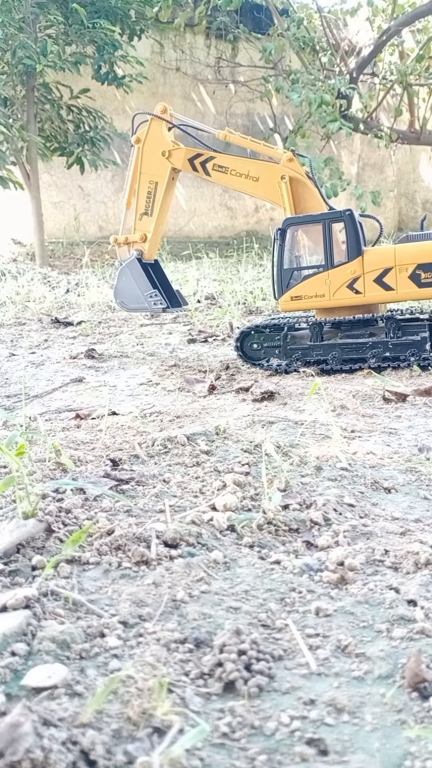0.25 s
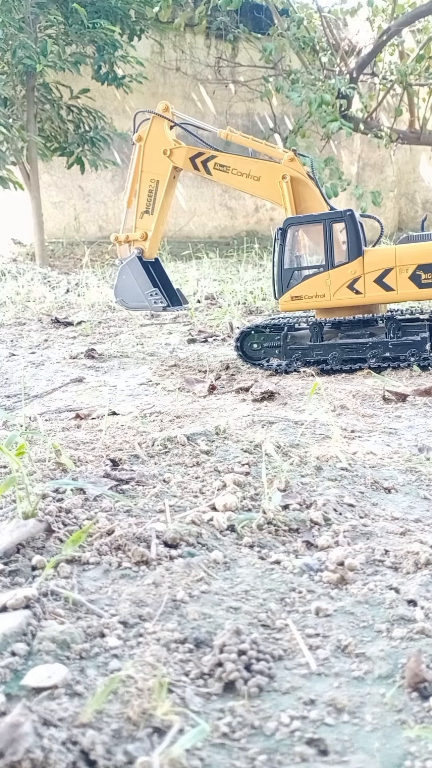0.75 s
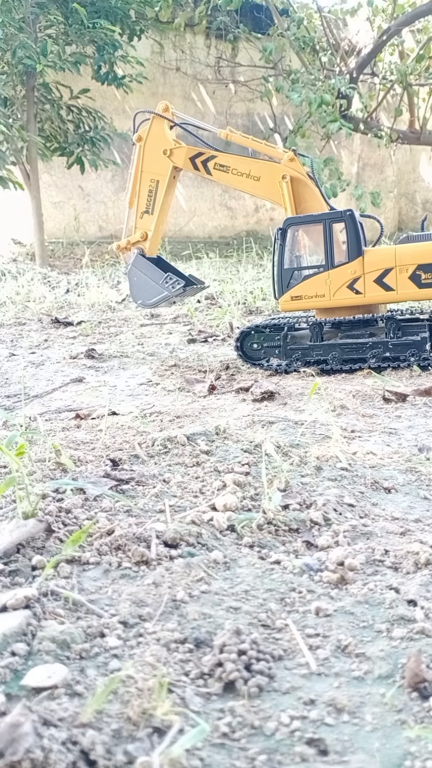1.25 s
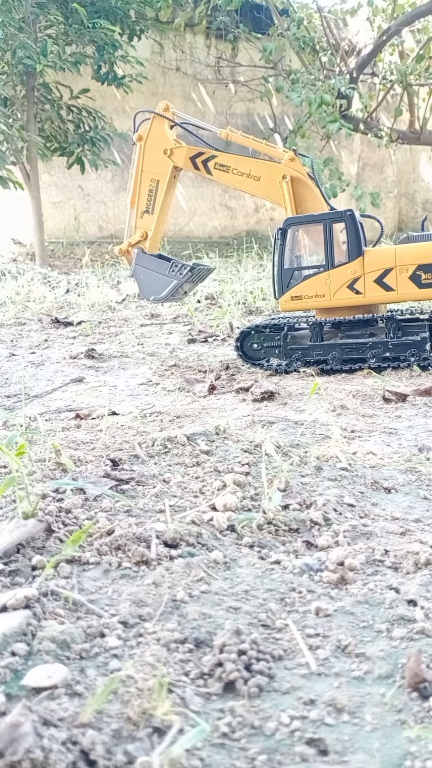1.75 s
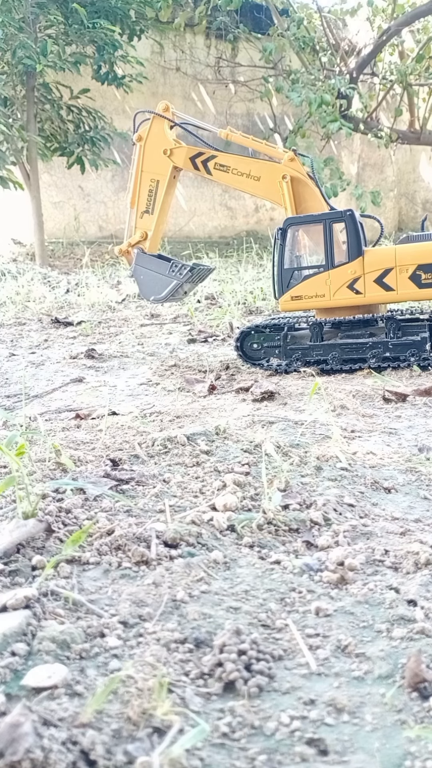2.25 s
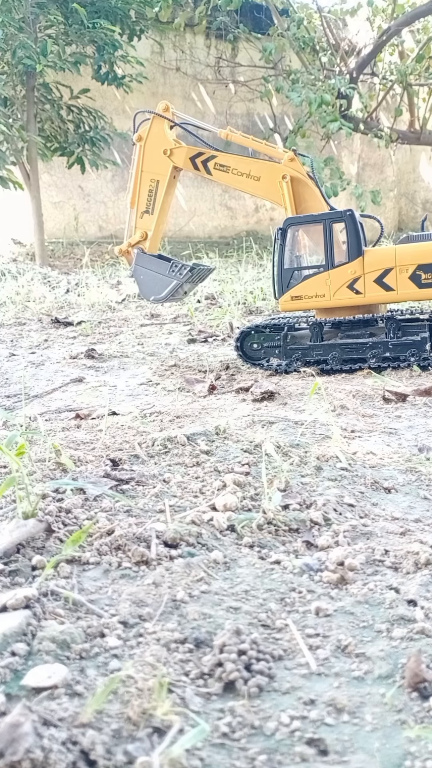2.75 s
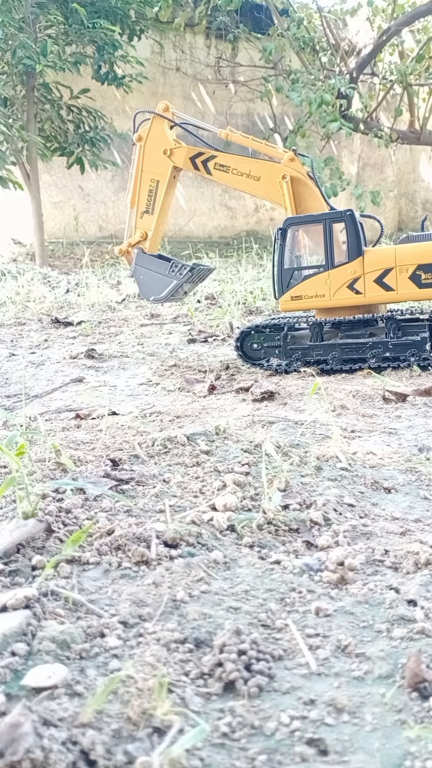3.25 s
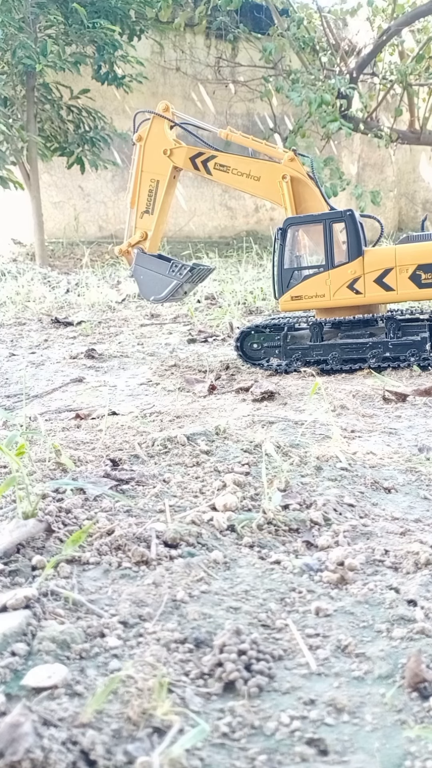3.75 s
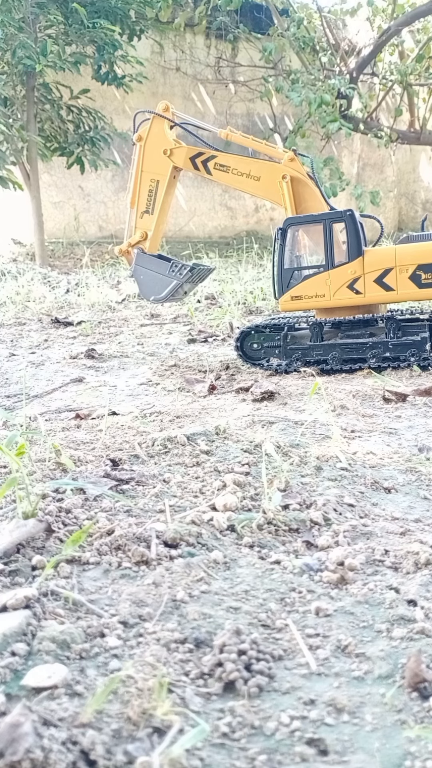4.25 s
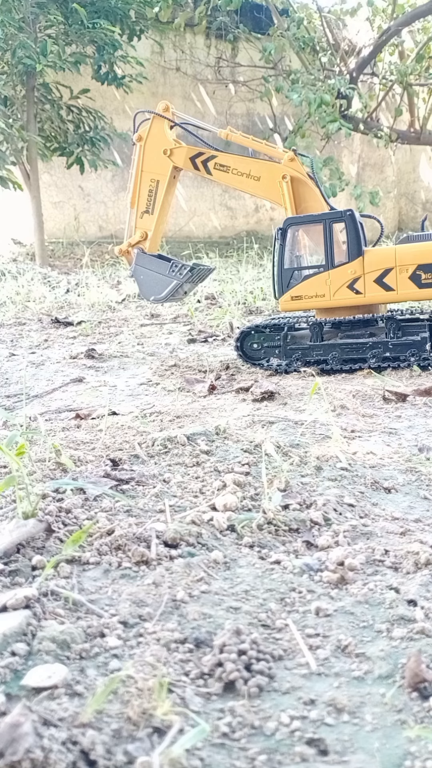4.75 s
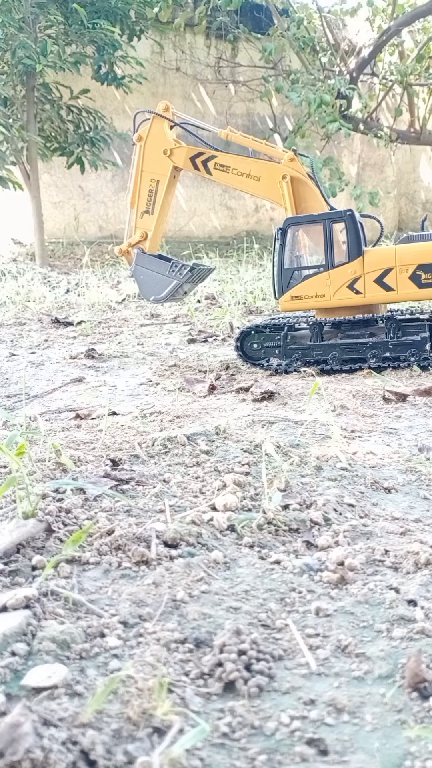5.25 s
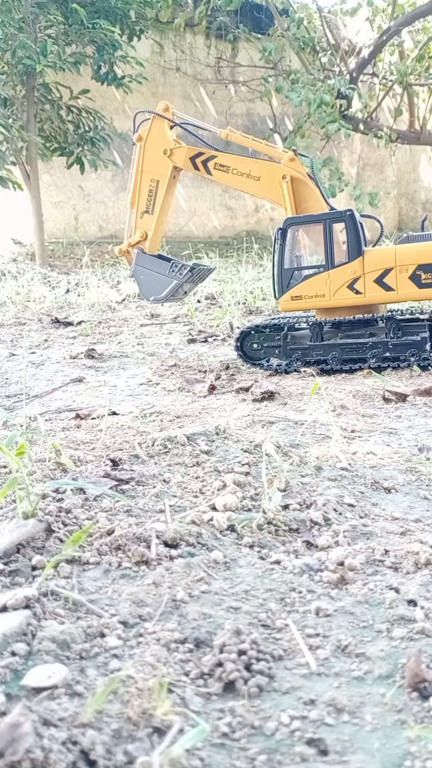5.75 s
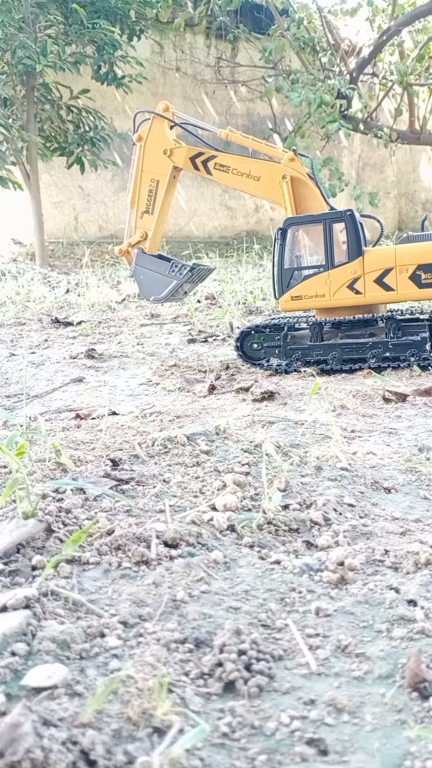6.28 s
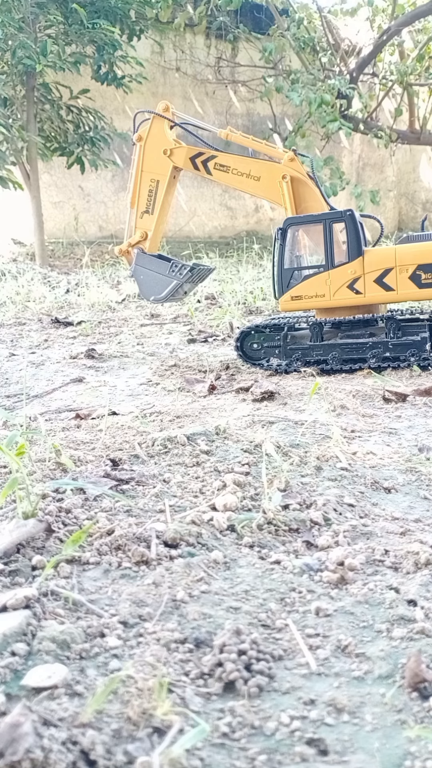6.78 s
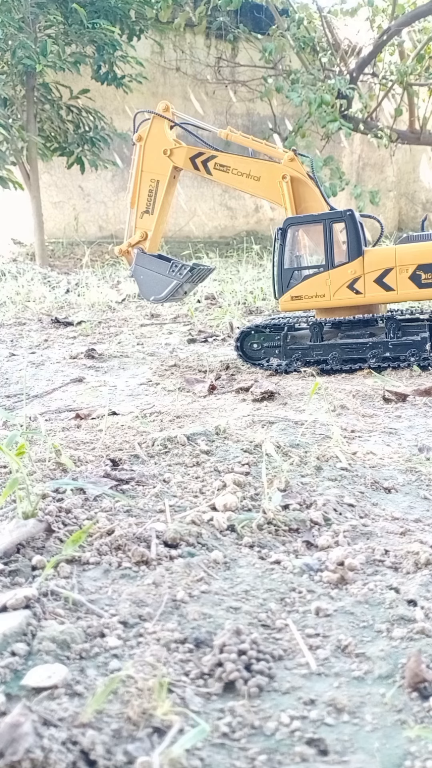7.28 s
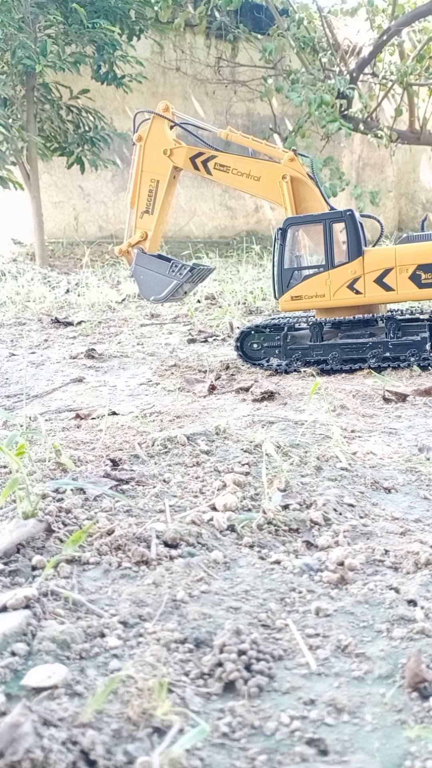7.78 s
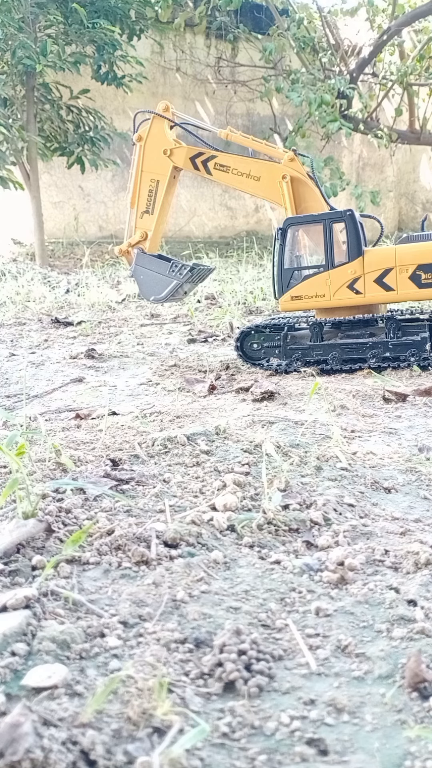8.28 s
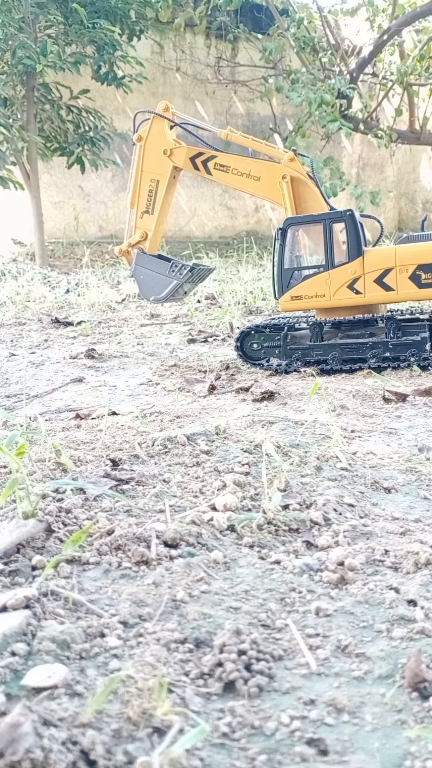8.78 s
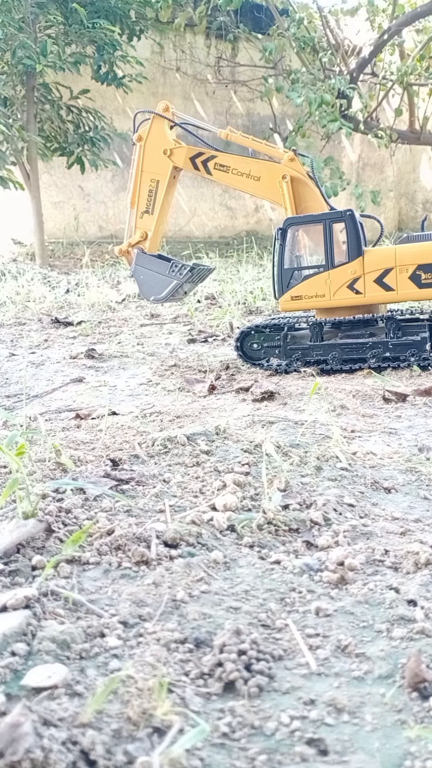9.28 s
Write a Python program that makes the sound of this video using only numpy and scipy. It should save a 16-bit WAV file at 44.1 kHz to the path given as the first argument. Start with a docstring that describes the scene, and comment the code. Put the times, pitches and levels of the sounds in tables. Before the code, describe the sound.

A toy digger's little motor whirs twice, plastic keeps clicking irregularly, then scuffs dry soil and knocks hardest near the end, over quiet outdoor air.

```python
"""A toy digger in a small walled yard, heard by one microphone over a low distant rumble and soft air.
Small birds chirp further off from the start; then plastic clicks begin, sharp and uneven.
The geared motor soon whirs in two short bursts that curl the bucket, and the clicks go on.
From about 5 s plastic also scuffs the soil; past 8 s come the hardest knocks and a last nudge of the motor.
Clicks and knocks are struck resonances, the motor is meshing teeth, and noise tails answer from the walls."""
import sys
import numpy as np
from scipy import signal
from scipy.fft import rfft, irfft, next_fast_len
from scipy.io import wavfile
from scipy.ndimage import map_coordinates

SR = 44100
rng = np.random.default_rng(int(sys.argv[2]) if len(sys.argv) > 2 else 0)


def pcm_store(signal):
    """Save signal as 16-bit PCM."""
    levels = np.round(np.clip(np.atleast_2d(signal), -1, 1) * 32767)
    wavfile.write(sys.argv[1], SR, levels.astype(np.int16).T)


N = 419832

# plastic clicks: start_s [s], knock_hz [Hz], knock_db [dB], overtone_db [dB], snap_db [dB],
# hardness_db of the contact [dB]
CLICKS = [(0.7172, 1090, -35.5, -52, -36.5, 6), (1.14, 1100, -30, -38.5, -30, -10.5),
          (1.3883, 1036, -33.5, -63, -30.5, 3), (1.66, 1140, -31, -39, -31, -4),
          (2.1305, 1080, -36.5, -48.5, -30.5, 3.5), (2.4107, 1113, -31.5, -36.5, -30.5, -3),
          (2.504, 1000, -46.5, -38.5, -34.5, 3.5), (3.1183, 1147, -34.5, -34, -34, 0),
          (3.302, 1060, -44, -42.5, -35.5, 4), (3.657, 1146, -39.5, -34, -36.5, -5),
          (3.663, 1035, -30.5, -38.5, -28.5, 1), (3.713, 1116, -51, -46, -44.5, -0.5),
          (4.0783, 1144, -33, -32.5, -31, -1.5), (4.101, 1080, -56.5, -64, -48, -13),
          (4.1329, 990, -55, -55.5, -48.5, 0.5), (4.305, 1040, -34.5, -39.5, -33, 1.5),
          (4.578, 1105, -36.5, -35, -41.5, 6.5), (4.6002, 975, -35, -35, -31, 3),
          (4.8703, 1070, -55.5, -48.5, -37, 1), (4.9385, 1020, -32, -40, -32, -3.5),
          (5.0747, 970, -85, -88.5, -57.5, -4), (5.12, 1050, -64.5, -60, -42, -9),
          (5.44, 996, -32, -40, -29.5, 0), (5.946, 1040, -71.5, -70.5, -48, 1.5),
          (6.0031, 1054, -33, -36.5, -29, 7.5), (6.047, 990, -47, -48, -47, 4),
          (6.053, 1024, -46.5, -44, -31, 1), (6.2772, 1070, -76, -79, -55, -8),
          (6.435, 893, -43.5, -49.5, -44.5, -1.5), (6.7599, 918, -34, -44.5, -44, -0.5),
          (6.8136, 1180, -61, -68, -45.5, -2), (6.8619, 1230, -67, -80, -56, 4.5),
          (7.0455, 960, -42.5, -54, -49.5, -4), (7.062, 905, -39.5, -69, -55.5, -10),
          (7.2828, 1070, -36.5, -41.5, -34.5, 1.5), (7.319, 1210, -65, -50, -48, 0),
          (7.3654, 1030, -53.5, -64, -46.5, -0.5), (7.949, 1020, -62, -80, -63, -7),
          (8.1336, 1200, -65, -57, -42, -6.5), (8.139, 1090, -58, -59, -37.5, 0),
          (8.146, 1000, -44.5, -47, -40, 3), (8.167, 1056, -24.5, -30, -27, 2.5),
          (8.1726, 950, -30, -31, -25.5, 9), (8.177, 1085, -32.5, -41, -28, 3),
          (8.1939, 1087, -40.5, -40, -39, -4), (8.2296, 1080, -50, -50, -47, -6),
          (8.239, 1060, -48, -46.5, -40.5, -2), (8.2574, 1070, -60, -58, -48, 1),
          (8.4032, 980, -36, -68, -33.5, 3.5), (8.487, 990, -76.5, -80.5, -47, 4),
          (8.9366, 956, -32, -52.5, -39, -7.5), (9.3379, 886, -44, -37.5, -49.5, -7),
          (9.343, 1030, -35, -43, -40.5, 3)]
# modes of the plastic shell: mode_hz [Hz], width_hz [Hz], level_db before the hardness weighting [dB]
SHELL_MODES = [(2366, 223, 5), (2720, 310, 1.5), (3260, 490, -2), (3890, 310, 2.5)]
# colour of a snap's bright edge: freq_hz [Hz], relative level_db before the fizz gain [dB]
EDGE_COLOUR = [(3000, -45.5), (4300, 7), (4950, 5.5), (6000, -9), (6900, -10), (8400, -27.5), (9400, -50.5),
               (10400, -36), (11800, -55.5), (14800, -24), (16000, -31)]
SNAP_HZ, SNAP_HZ_PER_DB = 3228, 25.5  # centre of the snap; a harder contact raises it
EDGE_DB = -8.5  # bright edge relative to the snap, at hardness 0
# edge level where the top treble starts to gain [dB], gain per dB, most gain [dB]
FIZZ_FROM_DB, FIZZ_GROWS, FIZZ_MAX_DB = -42, 1.5, 9.5


def clicks(knock_hz_width=290, overtone_hz=1560, overtone_hz_width=380, slip_s=0.006,
           snap_decay_s=0.0032, rattle_db=-26, rattle_t60=0.032, focus=0.42, scuff=0.12,
           room_db=-18, knock_room_db=-21):
    """Each click is a few ms of slipping contact that rings the shell and two hollow body modes."""
    out, t = np.zeros(N), np.arange(SR // 20) / SR
    contact = np.exp(-t / snap_decay_s) + amp(rattle_db - 60 * t / rattle_t60)

    def scrape():
        return contact * rng.standard_normal(len(t))

    def blow():
        slip = np.exp(-(t / slip_s) ** 2) * rng.standard_normal(len(t))
        return (t == 0) + scuff * slip

    for s, knock_hz, knock_db, overtone_db, snap_db, hardness_db in CLICKS:
        snap = strength(above(filtered(scrape(), shell_response(hardness_db, focus)), 1300), snap_db)
        # harder snaps are richer in the highest treble
        edge_db = snap_db + EDGE_DB + hardness_db
        fizz_db = min(FIZZ_GROWS * (edge_db - FIZZ_FROM_DB), FIZZ_MAX_DB)
        edge = [(hz, db + (hz > 8000) * fizz_db) for hz, db in EDGE_COLOUR]
        snap += strength(above(filtered(scrape(), causal(edge)), 3000), edge_db)

        knock = strength(above(ring(blow(), knock_hz, knock_hz_width), knock_hz), knock_db)
        varied_hz = overtone_hz * (1 + 0.013 * rng.normal())
        overtone = above(ring(blow(), varied_hz, overtone_hz_width), 760)
        knock += strength(overtone, overtone_db)

        add(out, s, snap + knock)
        add(out, s, strength(panels(), snap_db + PANEL_DB))
        to_walls = amp(room_db) * snap + amp(knock_room_db) * knock
        add(out, s, yard(to_walls, stretch=0.6, delay=0.014))
    return out


def shell_response(hardness_db, focus):
    """Resonances of the shell in parallel; a harder contact favours the higher modes."""
    snap_hz = SNAP_HZ + SNAP_HZ_PER_DB * hardness_db
    modes = []
    for mode_hz, width_hz, db in SHELL_MODES:
        weight = np.exp(-(np.log(mode_hz / snap_hz) / focus) ** 2 * 2)
        modes.append((mode_hz * (1 + 0.011 * rng.normal()), width_hz, amp(db) * weight))

    def response(hz):
        total = 0
        for k, (f, w, gain) in enumerate(modes):
            # neighbouring modes alternate in sign
            total = total + (-1) ** k * gain * 1j * hz * w / (f * f - hz * hz + 1j * hz * w)
        return total / (1 + (hz / 5000) ** 8)
    return response


# lowest and highest mode [Hz], decay time [s], level relative to the snap [dB]
PANEL_LOW_HZ, PANEL_HIGH_HZ, PANEL_T60, PANEL_DB = 2403, 5920, 0.18, -20


def panels(count=5):
    """Thin panels ring on in a few narrow modes, different ones for every contact."""
    t = np.arange(SR // 4) / SR
    hz = PANEL_LOW_HZ * (PANEL_HIGH_HZ / PANEL_LOW_HZ) ** rng.random((count, 1))
    modes = np.sin(2 * np.pi * hz * t).sum(0) * amp(-60 * t / PANEL_T60)
    return modes / np.linalg.norm(modes)


# heavier knocks that also shake the chassis: start_s [s], pitch_hz [Hz], level_db [dB]
THUDS = [(5.442, 865, -56.5), (6.437, 483, -60.5), (6.761, 873, -48.5), (7.062, 704, -57),
         (8.168, 684, -37.5), (8.176, 623.4, -40), (8.198, 670, -51), (8.404, 650, -51)]


def thuds(width_hz=230, slip_s=0.0089, room_db=-17):
    """The heavier knocks ring the chassis lower down."""
    out, t = np.zeros(N), np.arange(SR // 20) / SR
    for s, hz, db in THUDS:
        push = (t == 0) + 0.34 * np.exp(-t / slip_s) * rng.standard_normal(len(t))
        thud = strength(ring(push, hz, width_hz), db)
        add(out, s, thud)
        add(out, s, amp(room_db) * yard(thud, stretch=1.1, delay=0.02))
    return out


# motor bursts (two curl the bucket, a late one only nudges it), one curve each:
# time_s [s], effort_db [dB], tooth_hz before the load wobble [Hz]
MOTOR_RUNS = [
    [(.87, -70.5, 1240), (.9, -50.5, 1161), (.97, -47.5, 1008), (1.05, -50.5, 930), (1.12, -45.5, 951),
     (1.2, -54.5, 882), (1.27, -62, 790), (1.37, -69, 775)],
    [(1.46, -59.5, 854), (1.525, -51.5, 1028), (1.565, -53.5, 1074), (1.595, -44.5, 1112),
     (1.63, -52, 1076), (1.68, -47, 1161), (1.73, -65, 1223), (1.77, -85, 1220)],
    [(8.37, -65.5, 902), (8.42, -54, 991), (8.48, -62, 1018), (8.525, -64, 985), (8.55, -78, 900)],
]
# colour of the gearbox housing: freq_hz [Hz], relative level_db [dB]
HOUSING_COLOUR = [(400, -46), (700, -12.5), (920, -8.5), (1150, -8), (1350, -16.5), (1650, -6),
                  (2500, -11.5), (3100, -18), (3850, -7), (4450, -3), (5250, -20.5), (6900, -12),
                  (8500, -45), (11300, -46), (12900, -24.5), (15500, -21)]
# the whine swells where the teeth hit the body's resonance: centre, half width, most gain
WHINE_PEAK_HZ, WHINE_WIDTH_HZ, WHINE_PEAK_DB = 1130, 76, 6.5


def gearbox(whir_db=-0.95, whine_db=-9, room_db=-8, grind_db=2.0):
    """Meshing teeth whine; uneven partials of the pinion's turn and scraping buzz through the housing."""
    out = np.zeros(N)
    for run in MOTOR_RUNS:
        s, *cols = np.transpose(run)
        t = np.arange(s[0], s[-1], 1 / SR)
        size = len(t)
        effort_db, tooth_hz = [np.interp(t, s, c) for c in cols]
        load = 1 + .016 * wobble(40, size) + .012 * wobble(300, size)
        phase = 2 * np.pi * np.cumsum(tooth_hz * load) / SR
        turn = phase / 4  # four teeth on the pinion

        # each partial swells, fades and drifts on its own
        buzz = np.zeros(size)
        for k in range(5, 58):
            swell = amp(5 * wobble(30, size))
            buzz += swell * np.sin((k + .3 * rng.normal()) * turn + 2 * wobble(45, size))
        scrape = rng.standard_normal(size) * (1 + .5 * np.sin(turn))
        grind = (.4 * scrape + unit(buzz)) * amp(grind_db * wobble(200, size))
        housing = coloured(grind, HOUSING_COLOUR)

        mesh = unit(np.sin(phase + .5 * wobble(160, size)) * amp(4 * wobble(90, size)))
        resonance_db = WHINE_PEAK_DB / (1 + ((tooth_hz - WHINE_PEAK_HZ) / WHINE_WIDTH_HZ) ** 2)
        sound = amp(effort_db) * (amp(whir_db) * housing + amp(whine_db + resonance_db) * mesh)
        add(out, s[0], sound)
        add(out, s[0], amp(room_db) * yard(sound, stretch=0.84, delay=.012))
    return out


# gritty scuffs of plastic on dry soil: peak_s [s], level_db [dB], length_s [s]
SCUFFS = [(4.899, -58, .14), (6.89, -62.5, 0.4), (7.033, -59.5, .15), (7.844, -41.5, .1),
          (7.909, -69, 0.22), (8.214, -41.5, 0.21)]
# colour of the grit: freq_hz [Hz], relative level_db [dB]
GRIT_COLOUR = [(290, -44.5), (500, -20), (604, -31), (1050, 1), (1530, -19), (1790, -21), (2690, -0.5),
               (3590, 4), (5470, -5), (9220, -37.5), (14900, -26.5), (16000, -37)]
SCUFF_RISE, SCUFF_DEPTH_DB = 0.36, 28  # share of the length spent swelling; both ends lie this far down
CRUMBS_PER_S, CRUMB_DB = 110, -4.5  # single crumbs that snap, and their level against the hiss


def scuffs(grain_db=3.0, ring_db=-15, room_db=-13):
    """Soil crumbs catch and let go in uneven bursts and ring the panels; each scuff swells and fades."""
    out = np.zeros(N)
    for s, db, length in SCUFFS:
        u = np.linspace(0, 1, int(length * SR))
        fade_db = np.interp(u, [0, SCUFF_RISE, 1], [SCUFF_DEPTH_DB, 0, SCUFF_DEPTH_DB])
        grains = unit(rng.standard_normal(len(u)) * amp(grain_db * wobble(450, len(u))))
        crumbs = (rng.random(len(u)) < CRUMBS_PER_S / SR) * rng.standard_normal(len(u))
        grains += amp(CRUMB_DB) * unit(crumbs)
        sound = amp(db - fade_db) * coloured(grains, GRIT_COLOUR)
        start = s - SCUFF_RISE * length
        add(out, start, sound)
        add(out, start, amp(ring_db) * signal.fftconvolve(sound, panels()))
        add(out, start, amp(room_db) * yard(sound, stretch=0.7, delay=0.01))
    return out


# bird chirps: start_s [s], length_s [s], final pitch_hz before the rasp [Hz],
# level_db before the direct and wall gains [dB]
CHIRPS = [(0.217, 0.056, 1152, -67.5), (0.275, 0.033, 1180, -70), (0.563, 0.037, 1134, -73),
          (1.313, 0.044, 1211, -65.5), (1.779, 0.042, 1205, -61.5), (2.5, .02, 1256, -54.5),
          (3.058, 0.034, 1250, -62.5), (3.293, 0.028, 1258, -61), (3.975, 0.047, 1146, -71),
          (4.853, 0.029, 1260, -59.5), (5.425, 0.027, 1270, -60.5), (5.793, 0.034, 1158, -69),
          (6.274, 0.016, 1380, -67), (8.045, 0.03, 1227, -65), (8.682, 0.052, 1146, -66.5),
          (8.775, 0.029, 1056, -66.5)]
CHIRP_RISE_PER_S = 4.1  # share of the pitch climbed, per second of chirp length


def birds(direct_db=-1, room_db=1):
    """Short raspy rising chirps, strongest in harmonics three to five, smeared by the yard."""
    out = np.zeros(N)
    for s, length, hz, db in CHIRPS:
        u = np.linspace(0, 1, int(length * SR))
        rasp = .028 * wobble(700, len(u))
        climb = CHIRP_RISE_PER_S * length * (1 - u) ** 2
        phase = 2 * np.pi * np.cumsum(hz * (1 - climb + rasp)) / SR
        voice = np.zeros(len(u))
        for k, harmonic_db in enumerate([-17.5, -3.5, 3, -9, -25.5], 2):  # from the second up
            voice += amp(harmonic_db + 5.8 * wobble(80, len(u))) * np.sin(k * phase)
        chirp = amp(db) * unit(voice * np.sin(np.pi * u))
        add(out, s, amp(direct_db) * chirp)
        add(out, s, amp(room_db) * yard(chirp, stretch=0.65, delay=0.0078))
    return out


# distant tones, hoots and whistles: start_s [s], length_s [s], pitch_hz before the waver [Hz],
# level_db before the common trim [dB]
TONES = [(1.401, .19, 308, -60), (1.662, 0.11, 160, -59), (1.894, 0.097, 3340, -70),
         (1.899, 0.078, 3930, -64.5), (1.89, 0.1, 4240, -69), (2.248, 0.092, 3900, -69.5),
         (3.168, 0.1, 423, -76), (3.56, .12, 197, -71), (3.686, 0.11, 250.7, -56.5),
         (6.441, 0.081, 436, -69), (6.872, 0.13, 3960, -71.5), (7.564, 0.076, 1260, -64),
         (7.655, 0.17, 1249, -56)]


def tones(waver=.008, trim_db=-1.0):
    """Faint, slightly wavering sine tones from far away; each swells and fades."""
    out = np.zeros(N)
    for s, length, hz, db in TONES:
        u = np.linspace(0, 1, int(length * SR))
        phase = 2 * np.pi * np.cumsum(hz * (1 + waver * wobble(80, len(u)))) / SR
        swell = np.abs(np.sin(np.pi * u)) ** 0.35
        add(out, s, amp(db + trim_db) * unit(np.sin(phase) * swell))
    return out


# level of the rumble: time_s [s], level_db before the flutter [dB]
RUMBLE_LEVEL = [(0.0, -82), (0.13, -53.5), (0.21, -72), (0.26, -58), (0.4, -70), (0.72, -55), (0.77, -69),
                (0.82, -64), (1.33, -59.5), (1.38, -76), (1.72, -42), (1.8, -58), (2.92, -74), (3.21, -60),
                (3.82, -76.5), (4.06, -61), (4.16, -83), (4.24, -59.5), (4.38, -81.5), (4.48, -59.5),
                (4.56, -79), (4.69, -55.5), (4.77, -75.5), (5.88, -54.5), (5.99, -73), (6.84, -65),
                (7.66, -71.5), (9.12, -74), (9.15, -65), (9.52, -76.5)]
# colour of the rumble: freq_hz [Hz], relative level_db [dB]
RUMBLE_COLOUR = [(20, -37.5), (35, -14), (58, 0.5), (76, -1), (90, 9), (110, -5.5), (160, -20),
                 (230, -30.5), (400, -65)]
# colour of the open air: freq_hz [Hz], relative level_db [dB]
AIR_COLOUR = [(60, -9.5), (150, 3), (260, -6.5), (550, -5), (1000, -2.5), (1350, 0), (1650, -2),
              (2000, -11.5), (4000, -15.5), (4900, -22), (5400, -17), (7000, -36.5), (11000, -40),
              (15500, -31)]
FLUTTER_DB, FLUTTER_PER_S = 2, 9  # quick random swells of the rumble


def background(air_db=-70):
    """Low noise swells as a distant rumble under the soft rush of the open air."""
    level_db = np.interp(np.arange(N) / SR, *np.transpose(RUMBLE_LEVEL))
    level_db += FLUTTER_DB * wobble(FLUTTER_PER_S, N)
    rumble = amp(level_db) * coloured(rng.standard_normal(N), RUMBLE_COLOUR)
    air = amp(air_db + 0.42 * wobble(1.6, N)) * coloured(rng.standard_normal(N), AIR_COLOUR)
    return rumble + air


# decay of the walled yard: freq_hz [Hz], t60_s before each source's stretch [s]
YARD_DECAY = [(300, 0.25), (1200, 0.27), (4000, 0.21), (7000, 0.28), (12000, 0.16)]


def yard(x, stretch, delay):
    """Diffuse answer of the walls: a noise tail of unit energy that builds up, then decays by pitch."""
    hz, t, z = signal.stft(rng.standard_normal(SR // 2), SR, nperseg=256)
    decay = amp(-60 * t / (stretch * along(YARD_DECAY, hz)[:, None]))
    tail = signal.istft(z * decay, SR, nperseg=256)[1]
    tail *= 1 - np.exp(-(np.arange(len(tail)) / SR / delay) ** 2)
    return signal.fftconvolve(x, tail / np.linalg.norm(tail))


def ring(x, hz, width_hz):
    """x through one resonance applied twice: a soft start and steep skirts."""
    return filtered(x, lambda f: (1j * f * width_hz / (hz * hz - f * f + 1j * f * width_hz)) ** 2)


def causal(spectrum):
    """The response of a body with this (Hz, dB) curve: it rings only after the blow."""
    def response(hz):
        c = irfft(np.log(amp(along(spectrum, hz))))
        # folding the cepstrum forward gives minimum phase
        return np.exp(rfft(c * (1 + np.sign(np.fft.fftfreq(len(c))))))
    return response


def above(x, hz):
    """x with the part below hz rolled off."""
    return signal.sosfilt(signal.butter(4, hz, "high", fs=SR, output="sos"), x)


def filtered(x, response):
    """x times a complex response of frequency."""
    m = next_fast_len(len(x) + 4096)  # padding leaves room for the ringing
    return irfft(rfft(x, m) * response(np.fft.rfftfreq(m, 1 / SR)), m)[:len(x)]


def coloured(x, spectrum):
    """x through a (Hz, dB) curve, at rms 1."""
    return unit(filtered(x, lambda hz: amp(along(spectrum, hz))))


def strength(x, db):
    """A short sound scaled so that its energy, spread over 10 ms, has this level."""
    return amp(db) * x / np.sqrt(np.sum(x ** 2) / (SR / 100))


def wobble(rate, size):
    """A smooth random curve, rate knots a second."""
    knots = rng.standard_normal(int(size * rate / SR) + 4)
    return map_coordinates(knots, [np.arange(size) * rate / SR])


def along(points, hz):
    """(Hz, value) points interpolated on a log frequency axis."""
    f, v = np.transpose(points)
    return np.interp(np.log(hz + 1), np.log(f + 1), v)


def amp(db):
    """Decibels to gain."""
    return 10 ** (np.asarray(db) / 20)


def unit(x):
    """x scaled to rms 1."""
    return x / np.sqrt(np.mean(x ** 2) + 1e-20)


def add(track, s, x):
    """Mix x into the track at time s."""
    i = int(np.clip(round(s * SR), 0, N - 1))
    track[i:i + len(x)] += x[:N - i]


def scene():
    """Everything as it reaches one microphone."""
    digger = clicks() + thuds() + gearbox() + scuffs()
    return (digger + birds() + tones() + background())[None]


TOP_HZ = 15800  # band limit of the recorder


def record(dry):
    """The recorder cuts steeply above its band limit."""
    return np.array([filtered(x, lambda hz: 1 / (1 + (hz / TOP_HZ) ** 160)) for x in dry])


dry = scene()
out = record(dry)
pcm_store(out)
```